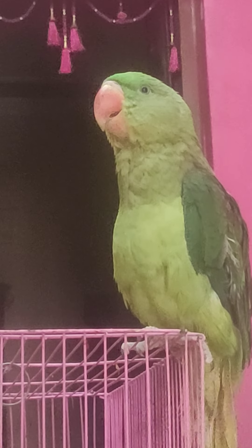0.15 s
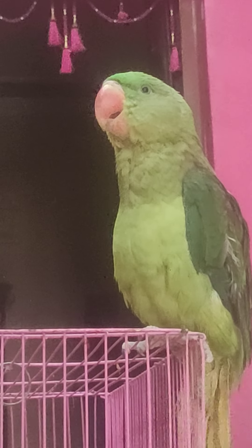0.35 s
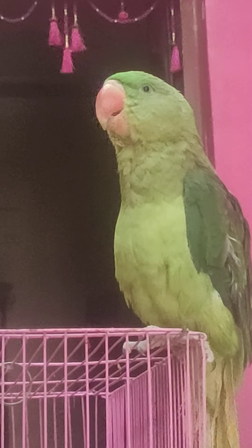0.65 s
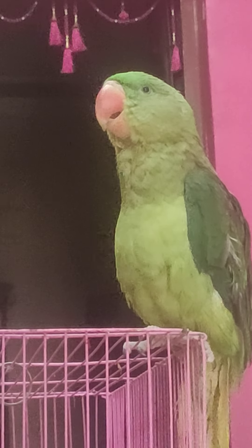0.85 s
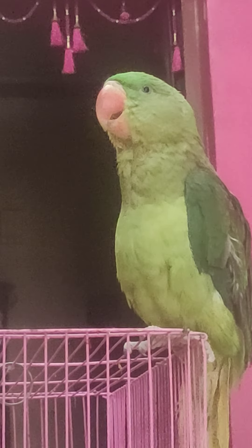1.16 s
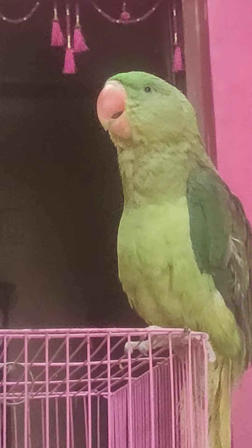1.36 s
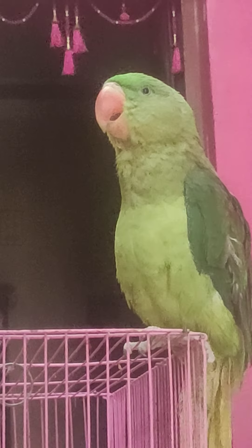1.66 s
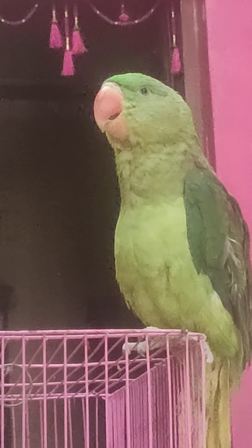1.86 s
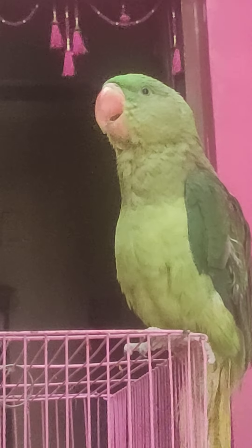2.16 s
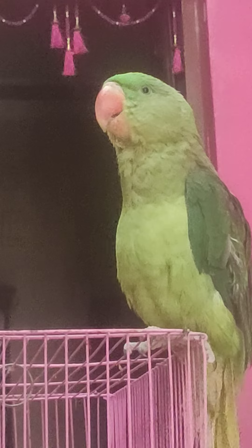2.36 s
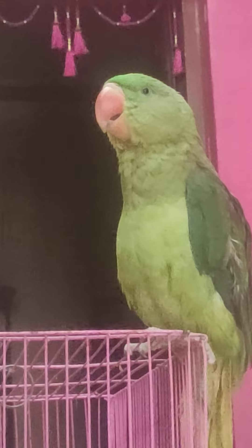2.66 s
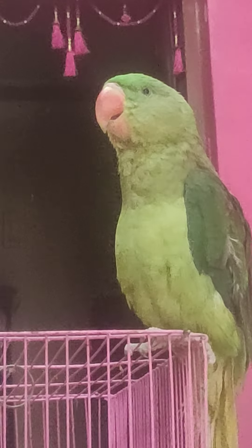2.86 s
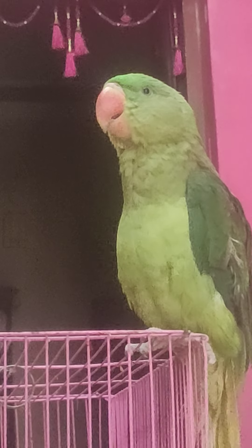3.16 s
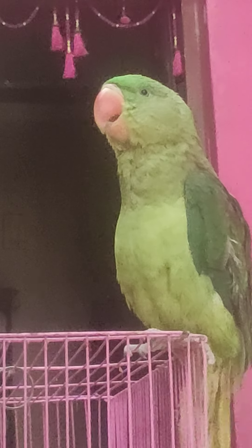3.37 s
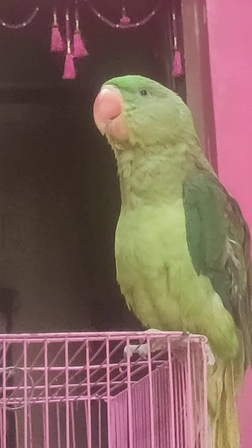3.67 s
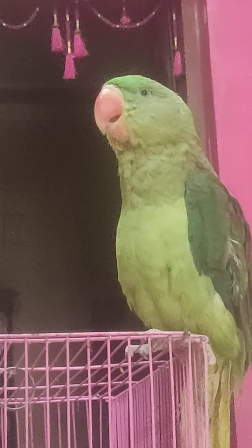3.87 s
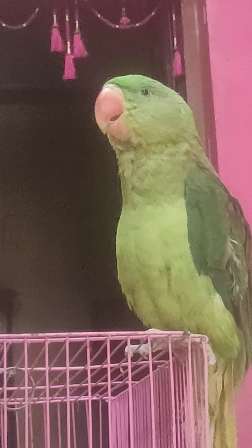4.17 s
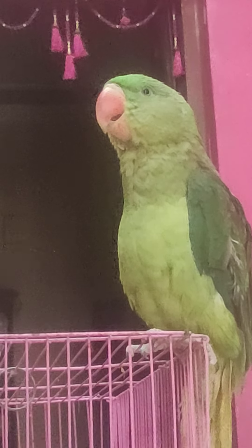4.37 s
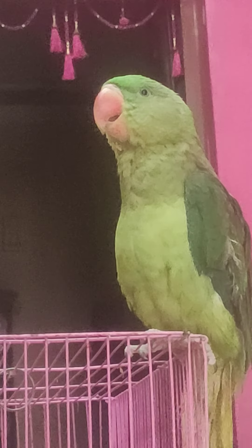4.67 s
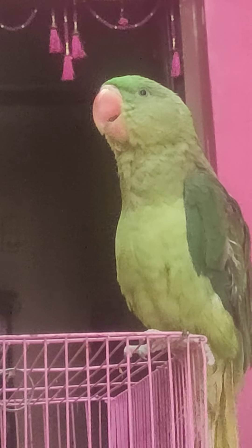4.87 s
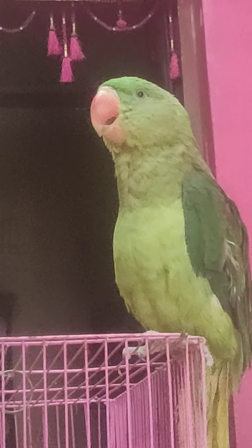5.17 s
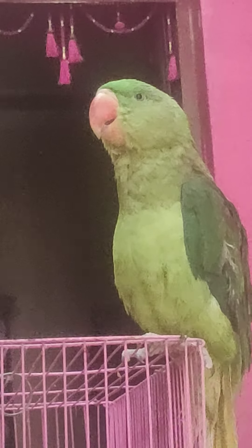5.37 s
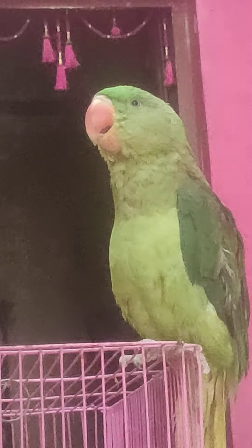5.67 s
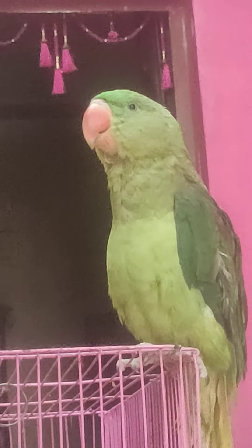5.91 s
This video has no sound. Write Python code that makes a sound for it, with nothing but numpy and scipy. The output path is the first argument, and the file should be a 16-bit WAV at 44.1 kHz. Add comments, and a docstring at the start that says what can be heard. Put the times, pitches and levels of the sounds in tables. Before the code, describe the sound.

Indoors, one parrot repeats brief squawks at a nearly even pace from beginning to end. The early ones are a little softer, two of them scooping hoarsely up from a low pitch; later ones are shriller and brighter, with quick chirpy upward flicks. Each leaves a short, hard room echo and a faint wiry ring. Behind is a patchy low murmur of room noise, with a brief deep rumble and dull knocks late on. Close microphone, limited treble.

```python
"""A pet parrot on its cage squawks over and over, close by in a small, hard-walled room.
Each squawk is a stack of harmonics on a gliding pitch near 1 kHz, roughened by a fast flutter of the syrinx.
The room answers with dense reflections, and narrow modes, probably the cage wires, ring with the overtones.
Underneath lie patchy low noise, a faint hum, a swell of deep rumble and a few soft bumps.
The microphone rolls off the treble."""
import sys
import numpy as np
from scipy import signal
from scipy.fft import rfft, irfft, next_fast_len
from scipy.io import wavfile
from scipy.ndimage import uniform_filter1d

SR = 44100
rng = np.random.default_rng(int(sys.argv[2]) if len(sys.argv) > 2 else 0)


def unload_audio(sound):
    """Save the sound as a 16-bit wav file, at the path given as the first command line argument."""
    columns = np.transpose(np.atleast_2d(sound))
    # keep every value between -1 and 1, then stretch to whole-number steps
    steps = np.round(np.clip(columns, -1, 1) * 32767)
    wavfile.write(sys.argv[1], SR, steps.astype(np.int16))


N = 266496  # length in samples
EDGE_HZ = 8650  # upper band limit of the recorder


def amp(db):
    """Decibels to gain."""
    return 10 ** (np.asarray(db) / 20)


def unit(x):
    """Scales to an rms of one."""
    return x / np.sqrt(np.mean(x ** 2) + 1e-20)


def read(points, hz):
    """Reads a curve over frequency, interpolated on a log-frequency axis."""
    f, value = np.transpose(points)
    return np.interp(np.log(hz + 1), np.log(f), value)


def add(mix, s, sound):
    """Mixes a sound in at time s, cutting whatever falls outside."""
    at = round(s * SR)
    sound = sound[max(0, -at):]
    part = mix[max(0, at):][:len(sound)]
    part += sound[:len(part)]


def colour(x, points):
    """Filters by a spectrum in dB."""
    size = next_fast_len(len(x) + 2048)
    gain = amp(read(points, np.fft.rfftfreq(size, 1 / SR)))
    return irfft(rfft(x, size) * gain, size)[:len(x)]


def band_noise(n, hz, width_hz):
    """Noise of rms about one in a bell around hz."""
    size = next_fast_len(n + 2048)
    bell = np.exp(-.5 * ((np.fft.rfftfreq(size, 1 / SR) - hz) / width_hz) ** 2)
    return unit(irfft(rfft(rng.standard_normal(size)) * bell, size))[:n]


def background(floor_db=-50.5, patchy_db=3.0):
    """Low room noise that drifts in patches of time and frequency, a faint hum and a swell of deep rumble."""
    # relative spectrum of the room noise: hz, level_db
    floor = [(27, -23), (36, 0), (44, 5), (75, -7.5), (97, -1), (125, -9), (200, -13), (330, -15.5),
             (520, -20.5), (720, -33.5), (1400, -31), (3000, -41), (7500, -49), (8500, -56.5)]
    # faint wavering hum: hz, rms_db
    hum_hz, hum_db = (50, -67)
    # rise and fall of the deep rumble: time_s, rms_db
    rumble = [(4.2, -72), (4.35, -43), (4.45, -45.5), (4.6, -45.5), (4.749, -60)]
    z = signal.stft(rng.standard_normal(N), nperseg=4096)[2]
    patches = uniform_filter1d(rng.standard_normal(z.shape), size=5, axis=1)
    patches = unit(uniform_filter1d(patches, size=3, axis=0))
    drifting = signal.istft(z * amp(patchy_db * patches))[1][:N]
    steady = amp(floor_db) * unit(colour(drifting, floor))
    hum = amp(hum_db) * band_noise(N, hum_hz, 4)
    swell = amp(np.interp(np.arange(N) / SR, *np.transpose(rumble)))
    return steady + hum + swell * band_noise(N, 31, 8.2)


def bumps(thud_db=-6, rise_s=0.0057):
    """Dull knocks: one decaying low mode and a short noisy thud each."""
    # soft low bumps: start_s, level_db (before the soft rise), mode_hz, t60_s
    knocks = [(4.261, -41, 122, 0.083), (4.347, -42.5, 208, 0.18), (4.485, -39.5, 201, .18),
              (4.785, -45.5, 243, 0.24), (4.889, -40, 178, 0.16)]
    out, t = np.zeros(N), np.arange(SR // 2) / SR
    for s, db, hz, t60 in knocks:
        body = np.sin(2 * np.pi * hz * t) + amp(thud_db) * band_noise(len(t), 200, 160)
        add(out, s, body * amp(db - 60 * t / t60) * (1 - np.exp(-t / rise_s)))
    return out


def room(x, first_s=0.0076, late_db=-25, late_t60=0.51):
    """Dense reflections of random sign, each band dying at its own speed, and a faint longer ring."""
    # room echo against the direct sound: hz, level_db
    echo = [(500, -5.5), (1100, -12), (1500, -3.5), (2100, 1.5), (3200, 0), (5000, -2), (7500, -5.5)]
    # decay of the main reflections: hz, t60_s
    decay = [(800, 0.3), (2100, 0.23), (5000, 0.2), (8000, 0.27)]
    step = 16  # one reflection in every 16 samples
    at = np.arange(0, SR - step, step)
    taps = np.zeros(SR)
    taps[at + rng.integers(0, step, len(at))] = rng.choice([-1., 1.], len(at))
    taps *= np.arange(SR) / SR > first_s
    hz, t, z = signal.stft(taps, SR, nperseg=256)
    main = amp(-60 * t / read(decay, hz)[:, None])
    late = amp(late_db - 60 * t / late_t60)
    tail = signal.istft(z * (main + late), SR, nperseg=256)[1]
    # level the spectrum, so that every band of the echo carries its own share of the energy
    spectrum, f = rfft(tail), np.fft.rfftfreq(len(tail), 1 / SR)
    spectrum /= np.sqrt(uniform_filter1d(abs(spectrum) ** 2, size=250))
    return signal.fftconvolve(x, irfft(spectrum * amp(read(echo, f))))[:N]


def wires(voice):
    """Narrow modes that ring on after an overtone has swept across them."""
    # thin lingering tones, probably the cage wires: hz, level_db (against the voice), t60_s
    modes = [(2846, -10, .9), (3068, -11, .7), (3489, -10, .7), (4289, -7, .9), (5142, -11, .7),
             (5430, -10, .8), (5621, -9, .8), (7100, -6, .8)]
    t = np.arange(SR) / SR
    ring = np.zeros(SR)
    for hz, db, t60 in modes:
        at_resonance = 2 * np.log(1000) / (t60 * SR)  # brings the gain at the mode to its level
        ring += amp(db - 60 * t / t60) * np.sin(2 * np.pi * hz * t) * at_resonance
    return signal.fftconvolve(voice, ring)[:N]


def false_start(s=1.002, tick_db=-38, tick_s=0.005, grunt_db=-41, grunt_hz=420, grunt_s=0.0088):
    """One tiny catch of the voice just before a squawk: a noise tick and a few low cycles."""
    n, t = round(tick_s * SR), np.arange(0, grunt_s, 1 / SR)
    tick = amp(tick_db) * rng.standard_normal(n) * signal.windows.tukey(n, .4)
    grunt = amp(grunt_db) * np.sin(2 * np.pi * grunt_hz * t) * (1 - t / grunt_s)
    out = np.zeros(max(n, len(t)))
    add(out, 0, tick)
    add(out, 0, grunt)
    return s, out


def glide(t, first_hz, crest_hz, last_hz, climb_s, bow, catch_hz, flick_hz, flick_s):
    """Pitch catches, glides to a crest, drifts on, and may flick up or down as the call ends."""
    catch_s = .0035  # the catch above the pitch settles at once
    flick_ease = 1.3  # how gently the closing flick sets in (1 = abruptly)
    climb = 1 - np.clip(1 - t / climb_s, 0, 1) ** bow
    drift = np.clip((t - climb_s) / max(t[-1] - climb_s, 1 / SR), 0, 1)
    flick = np.sin(np.pi / 2 * np.clip(1 - (t[-1] - t) / flick_s, 0, 1)) ** flick_ease
    path_hz = first_hz + (crest_hz - first_hz) * climb + (last_hz - crest_hz) * drift
    return path_hz + catch_hz * np.exp(-t / catch_s) + flick_hz * flick


def effort(t, level_db, low_db, high_db, top_db, attack_s, opening_s, closing_s, brighten_db, rough):
    """The fundamental is there almost at once; the overtones swell as the beak opens and fade as it closes."""
    # how far down the bird's effort starts and ends, and how quickly it goes
    attack_db, release_db, release_s = -13.5, -7.5, 0.0084
    # change of the overtones while the beak is nearly shut
    low_opening_db, high_opening_db, low_closing_db, high_closing_db = -8.5, -16, -3.5, -17.5
    # a small lift of the high overtones, and a further one toward both ends
    high_lift_db, high_ends_db = 0.21, 1
    # the shrill top, against the high overtones, leans to the start and droops at both ends
    top_drift_db, top_droop_db = -3.5, -4
    # the voice is rough as it catches and frays as it lets go
    catch_rough, catch_rough_s, closing_rough, closing_rough_s = 1, .014, 0.72, 0.015
    left, along = t[-1] - t, t / t[-1] - .5
    ends = (2 * along) ** 2  # 0 in mid-call, 1 at both ends
    opening, closing = np.clip(1 - t / opening_s, 0, 1), np.clip(1 - left / closing_s, 0, 1)
    level_db = level_db + attack_db * np.exp(-t / attack_s) + release_db * np.exp(-left / release_s)
    low_db = low_db + brighten_db / 2 * along + low_opening_db * opening + low_closing_db * closing
    high_db = high_db + high_lift_db + high_ends_db * ends + brighten_db * along
    high_db = high_db + high_opening_db * opening + high_closing_db * closing
    top_db = top_db + top_drift_db * along + top_droop_db * ends
    rough = rough + catch_rough * np.exp(-t / catch_rough_s) + closing_rough * np.exp(-left / closing_rough_s)
    return level_db, low_db, high_db, top_db, rough


def squawk(row, jitter=0.0042, flutter=0.0033, flutter_hz=312, shimmer=0.06,
           rasp_db=-3, rasp_width_hz=300, fade_s=0.001):
    """The syrinx buzzes on a gliding pitch; it breaks into rasp while it catches and when it lets go."""
    start, length = row[:2]
    t = np.arange(0, length, 1 / SR)
    pitch = glide(t, *row[2:10])
    level_db, low_db, high_db, top_db, rough = effort(t, *row[10:])
    # a scoop from below the usual register (1000 Hz) is hoarse, and its high overtones are weaker
    scoop = np.maximum(np.log2(1000 / pitch), 0)  # octaves below
    high_db = high_db - 3 * scoop
    rough = np.clip(rough + 0.71 * scoop, .04, .9)
    # a second, slower vibration of the membranes puts sidebands on every harmonic
    unsteady_hz = flutter_hz * (1 + .05 * band_noise(len(t), 0, 55))
    beat = np.sqrt(2) * np.sin(2 * np.pi * np.cumsum(unsteady_hz) / SR)
    # the pitch trembles more where the voice is rough
    wander = (0.79 + 2 * rough) * band_noise(len(t), 0, 160)
    phase = 2 * np.pi * np.cumsum(pitch * (1 + jitter * wander + flutter * beat)) / SR
    out = np.zeros(len(t))
    for k in np.arange(1, EDGE_HZ / pitch.min()):
        hz = k * pitch
        overtone = np.clip((hz - 1300) / 500, 0, 1) * (k > 1)
        high = np.clip((hz - 3200) / 1000, 0, 1)
        top = np.clip((hz - 6000) / 800, 0, 1)
        # each overtone flares and fades on its own: 2 dB, up to about 21 Hz
        flare_db = 2 * band_noise(SR, 0, 21)[:len(t)]
        above_db = (1 - high) * low_db + high * high_db + top * top_db + flare_db
        gain = amp(level_db + overtone * above_db)
        # uneven cycles fray the upper harmonics and leave the fundamental nearly pure
        fray = amp(rasp_db) * np.sqrt(rough / (1 - rough) / 2) * np.minimum(hz / 4800, 1.05) ** 2
        a, b = (band_noise(len(t), 0, rasp_width_hz) for _ in range(2))
        # the windpipe delays the harmonics unequally, which spreads each pulse
        angle = k * phase + k ** 2 * np.pi / 10
        frayed = (1 + fray * a) * np.cos(angle) + fray * b * np.sin(angle)
        out += gain * frayed / np.sqrt(1 + 2 * fray ** 2)  # fraying keeps the power
    edges = np.clip(np.minimum(t - t[0], t[-1] - t) / fade_s, 0, 1)
    return start, out * edges * (1 + shimmer * beat)


def scene(voice_db=0.91):
    """The parrot, its room, the ringing wires, the bumps and the background."""
    # one row per squawk: start_s, length_s,
    #  pitch: first_hz, crest_hz, last_hz, climb_s, bow (1 = straight), catch_hz, flick_hz, flick_s,
    #  effort before the throat's colour: fundamental_db, low_overtones_db and high_overtones_db (above it),
    #  shrill_top_db (above the high ones), attack_s, opening_s, closing_s,
    #  brightening_db (high overtones from start to end; half for the low), base roughness (0-1)
    squawks = [(-0.14, 0.18, 965, 1066, 1105, 0.092, 1.2, 2, 3, 0.02, -44.5, 5.4, 5.7, -2, 0.005, 0.067, 0.056, 6.5, 0.23),
               (0.25, 0.21, 907, 1132, 1147, 0.191, 1.2, 33, -6.5, 0.028, -38.5, 5.7, 6.9, -2, 0.0073, 0.071, 0.076, 1, 0.18),
               (0.641, 0.18, 441.5, 1197, 1160, 0.21, 3, 35, -200.0, 0.015, -38.5, 6.9, 0.4, 0, 0.014, 0.052, 0.026, -3, 0.23),
               (1.02, 0.27, 413, 1067, 1086, 0.13, 3.3, 74.5, -35, 0.014, -37.5, 6.6, 2.6, -0.4, 0.0043, 0.0089, 0.014, -2.0, 0.33),
               (1.535, 0.25, 895, 1160, 1170, 0.17, 1.2, 87, 106.5, 0.043, -37, 8.5, 8.6, -5.5, 0.015, 0.14, 0.048, 4.5, 0.15),
               (2.029, 0.2, 945.0, 1016, 1030, 0.09, 0.96, 345, 214.5, 0.054, -37.5, 7.8, 8.3, -5, 0.011, 0.083, 0.069, 5.5, 0.08),
               (2.456, 0.14, 859, 994, 1025, 0.096, 1.22, 227.5, 248, 0.016, -35.5, 6.6, 9.5, 1.5, 0.003, 0.1, 0.033, -8.0, 0.077),
               (2.825, 0.22, 823, 1106.0, 1053, 0.14, 1.1, 2, 36.5, 0.02, -35.5, 7.1, 9.5, 2, 0.024, 0.086, 0.028, 7.5, 0.11),
               (3.271, 0.19, 874, 996, 1047, 0.07, 1.3, 260.5, 190.0, 0.0048, -35.5, 5.4, 10.3, 0.5, 0.0051, 0.065, 0.023, 2.5, 0.044),
               (3.75, 0.15, 877, 1114, 1210, 0.097, 1.02, 252, 148, 0.025, -35.5, 5.7, 9.9, -1.8, 0.0039, 0.048, 0.02, 0.5, 0.14),
               (4.139, 0.2, 938, 1075, 1043, 0.076, 1.17, 130.0, 176, 0.0095, -38.5, 4.2, 8.65, -1.1, 0.0017, 0.022, 0.02, -10.5, 0.2),
               (4.581, 0.18, 926, 999, 1021, 0.101, 1.2, 702, 150.0, 0.078, -37, 8.4, 14.1, 1, 0.0023, 0.094, 0.099, -1, 0.22),
               (5.055, 0.18, 846.0, 1133.0, 1122, 0.14, 1.42, 171.5, -34.5, 0.019, -35.7, 6.4, 10.1, 1.7, 0.0018, 0.061, 0.023, -3, 0.1),
               (5.501, 0.18, 976, 1134, 1209, 0.11, 0.86, 200.5, 117.5, 0.035, -38, 6.7, 12.1, -1, 0.0052, 0.017, 0.093, 13.0, 0.26),
               (5.955, 0.12, 896, 917, 878, 0.04, 0.81, 232.5, 211.5, 0.065, -37, 7.3, 17.7, -0.5, 0.0039, 0.21, 0.01, 17, 0.25)]
    # colour of throat and beak: hz, gain_db
    throat = [(480, -2), (650, -8), (850, -1.5), (1050, 1.5), (1300, 0), (1550, -8), (2000, -3.5),
              (2350, -2.5), (2700, -6), (3200, -2), (3700, -5), (4200, -2), (4750, -6.5), (5400, -2),
              (6300, -16), (7250, -2.5), (7650, -8), (7950, -24)]
    voice = np.zeros(N)
    for row in squawks:
        add(voice, *squawk(row))
    add(voice, *false_start())
    voice = amp(voice_db) * colour(voice, throat)
    return (voice + room(voice) + wires(voice) + bumps() + background())[None]


def record(dry):
    """The microphone's colour, then the recorder's band limit."""
    # the microphone's treble falls away: hz, gain_db
    microphone = [(7500, -1), (8000, -12.5), (8400, -19), (8700, -23.5)]
    heard = colour(dry[0], microphone)[None]
    lowpass = signal.firwin(301, EDGE_HZ, window=("kaiser", 8), fs=SR)[None]
    return signal.oaconvolve(heard, lowpass, "same")


dry = scene()
out = record(dry)
unload_audio(out)
```